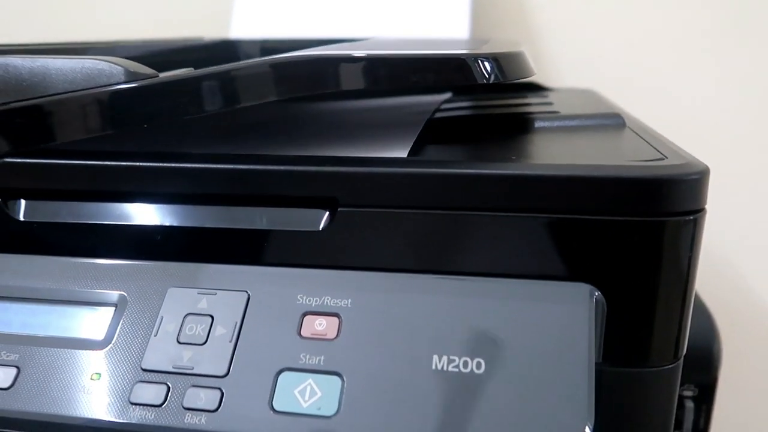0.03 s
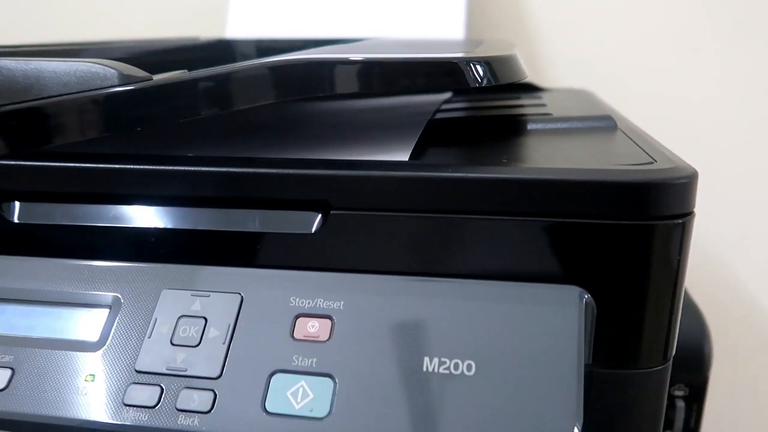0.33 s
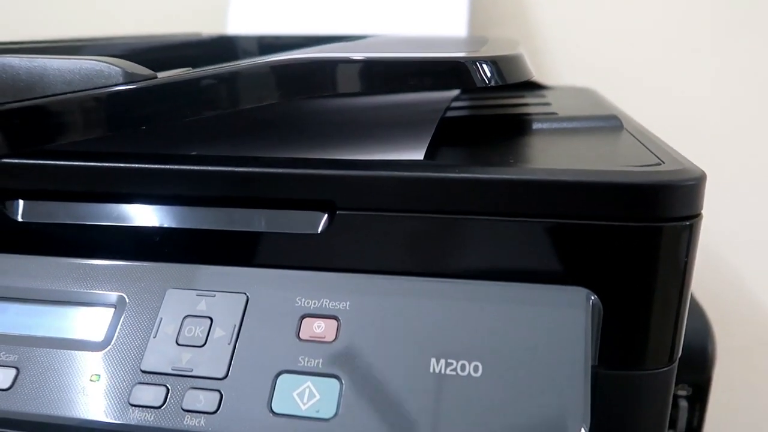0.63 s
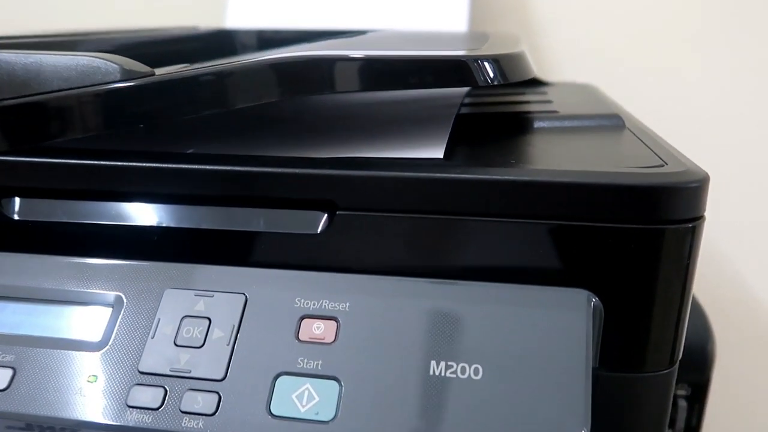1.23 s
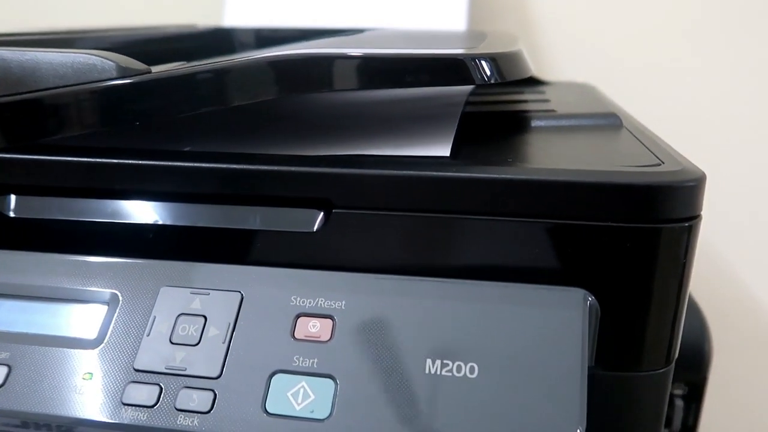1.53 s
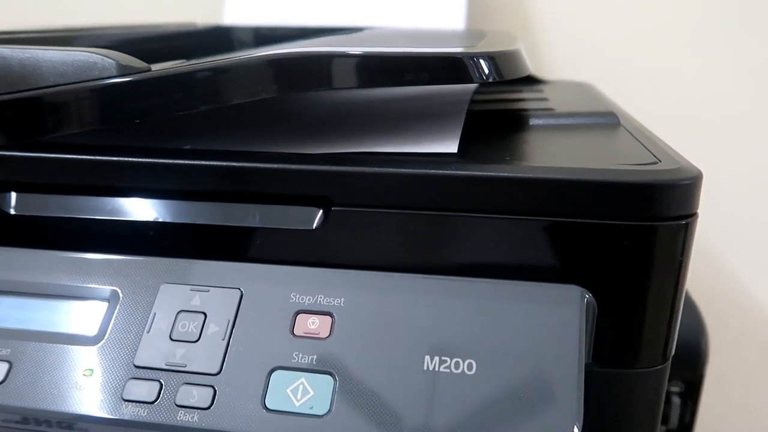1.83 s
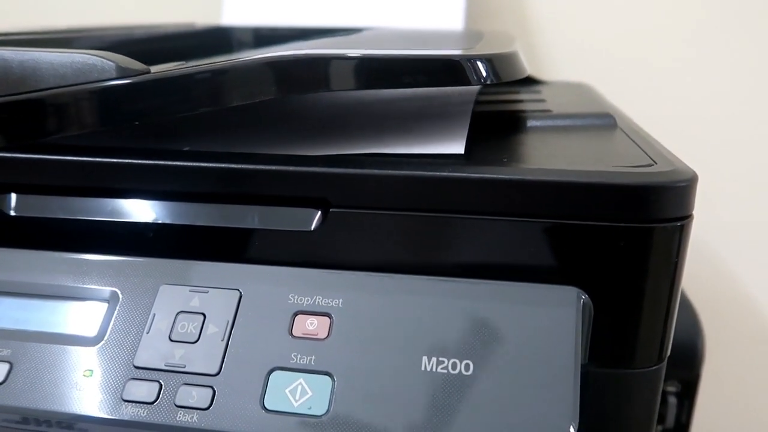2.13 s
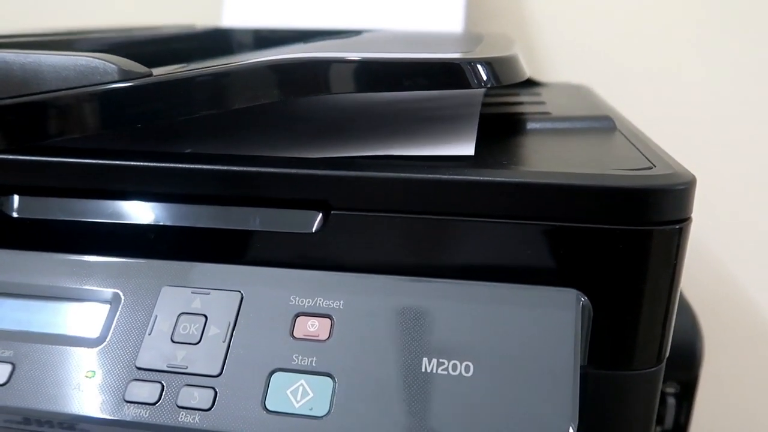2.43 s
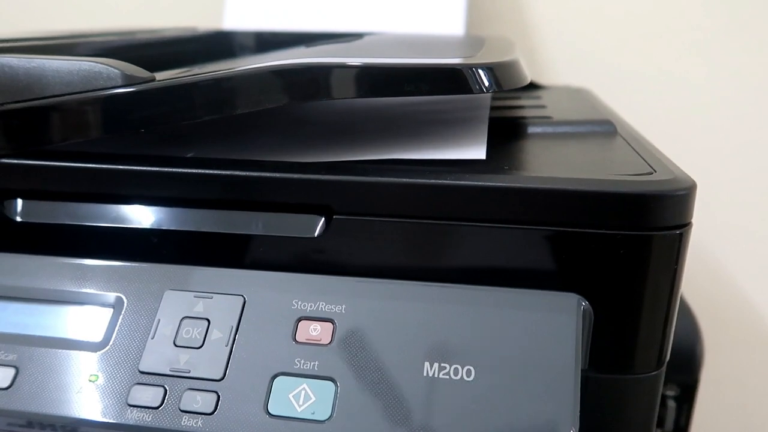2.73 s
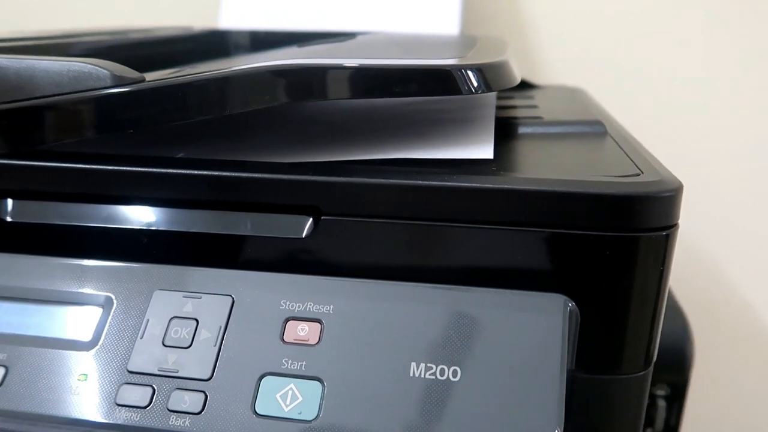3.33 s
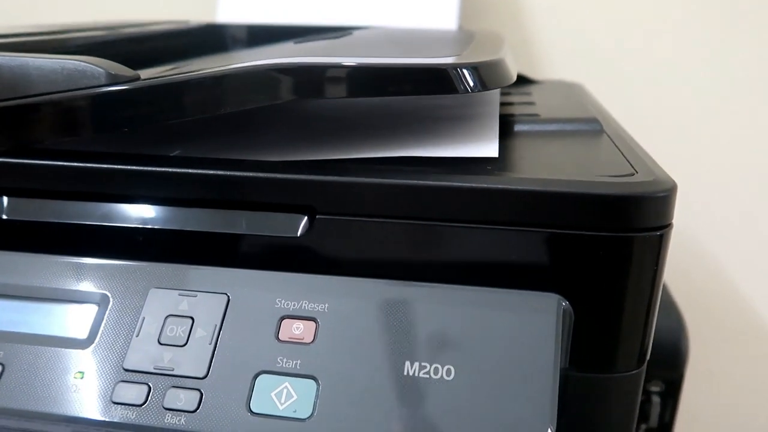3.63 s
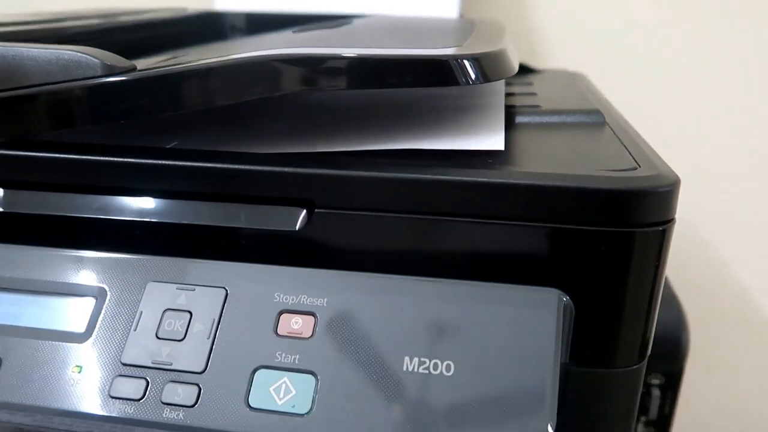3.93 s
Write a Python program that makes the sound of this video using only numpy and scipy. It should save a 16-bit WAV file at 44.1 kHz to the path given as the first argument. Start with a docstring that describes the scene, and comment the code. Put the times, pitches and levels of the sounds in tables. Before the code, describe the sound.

A desktop printer hums and whines, feeding a sheet with occasional plastic clacks and brief rasps.

```python
"""A desktop printer feeds a sheet: its stepper motor sings over whirring plastic gears and sliding paper.
A second drive makes three short, rasping advances; the stepper stops just before the last one.
Levers clack, small parts tick and squeak, and the edge of the sheet snaps off a guide.
Underneath, the hand holding the microphone adds low bumps, rumble and finger rub."""
import sys
import numpy as np
from scipy import signal
from scipy.fft import rfft, irfft
from scipy.io import wavfile

SR = 44100
rng = np.random.default_rng(int(sys.argv[2]) if len(sys.argv) > 2 else 0)


def to_wav(s):
    """Save 16-bit WAV."""
    ch = np.atleast_2d(s).T  # columns
    pcm = np.round(np.clip(ch, -1, 1) * 32767)  # PCM
    wavfile.write(sys.argv[1], SR, pcm.astype(np.int16))


N = 176400
T = np.arange(N) / SR

# stepper partials: step_rate_multiple, level_db
STEPPER_PARTIALS = [(1, -39), (1.5, -49), (3, -57), (4, -56), (6, -63)]
# the strong second partial, swelling as the sheet comes out: time_s, level_db
WHINE_LEVEL = [(0, -36), (.5, -42), (.8, -36.5), (1.15, -40), (1.5, -36.5), (2.6, -35.5), (3.3, -33)]
# gear train tones: pitch_hz, level_db
GEAR_TONES = [(44.5, -47.5), (88.3, -48), (119, -46.5), (178.1, -56.5), (196.6, -53.5), (214.6, -46),
              (221.6, -45.5), (242.7, -48), (311.5, -43), (400.5, -55.5), (476, -46), (660.7, -52.5),
              (748.7, -52), (1103.6, -56), (1235, -55)]
def feeder_motor(step_hz=433.6, stop_s=3.84, fade_s=0.0041, hum_hz=99.45, hum_db=-45):
    """Steady stepper partials and looser gear tones stop together; the mains hum stays."""
    slip = 0.006 * drift(30)
    steps = sum(amp(db) * tone(k * step_hz, k * slip) for k, db in STEPPER_PARTIALS)
    whine = curve(WHINE_LEVEL) * flutter(0.7, 8) * tone(2 * step_hz, 2 * slip)
    gears = sum(amp(db) * flutter(2, 13) * tone(hz, 0.047 * drift(1.1)) for hz, db in GEAR_TONES)
    running = np.exp(-np.maximum(T - stop_s, 0) / fade_s)
    hum = amp(hum_db) * tone(hum_hz)
    return widened((steps + whine + gears) * running + hum, apart=0.045)


# gear whirr EQ: freq_hz, gain_db
WHIRR_EQ = [(20, -32), (45, -22), (90, -2), (190, -5.5), (270, -4.5), (420, -6.5), (800, -7.5), (1200, -13),
            (1900, -19.5), (3200, -28.5), (5500, -36), (8000, -44.5), (11000, -49.5), (14000, -84)]
# housing drone EQ: freq_hz, gain_db
DRONE_EQ = [(20, -30), (50, -12.5), (95, 7.5), (135, -7), (185, 6), (250, -5.5), (330, -4.5), (500, -14.5),
            (1500, -70)]
# drone envelope: time_s, level_db
DRONE_LEVEL = [(0, -51), (.4, -35), (1.2, -35.5), (2, -32), (3.2, -34), (4, -32)]
def gear_whirr(whirr_db=-33):
    """Teeth knock densely inside the plastic housing, which drones more as the sheet advances."""
    whirr = amp(whirr_db) * spread(chatter(per_s=1200, spread_db=1.5, share=0.4), WHIRR_EQ)
    drone = curve(DRONE_LEVEL) * spread(rng.standard_normal((2, N)), DRONE_EQ)
    return flutter(0.23, 37) * (whirr + drone)


# paper scrape EQ: freq_hz, gain_db
SCRAPE_EQ = [(300, -44), (1200, 1), (2300, 0.5), (4600, -2.5), (6500, -7), (8500, -14), (11500, -18),
             (14500, -89)]
# scrape envelope: time_s, level_db
SCRAPE_LEVEL = [(0, -53), (.2, -50.5), (.35, -54), (.58, -66), (.65, -57), (.76, -54), (.84, -55),
                (1.05, -49.5), (1.3, -53.5), (1.85, -54), (2.0, -51), (2.3, -49), (2.55, -53.5), (2.7, -66),
                (2.9, -63), (3.1, -49.5), (3.5, -57.5), (4, -52.5)]
# airy hiss EQ: freq_hz, gain_db
AIR_EQ = [(1000, -8), (4000, -8), (8000, 4), (12000, 2), (13500, 5), (15200, -11)]
def sliding_paper(air_db=-61.5, air_follow=0.35):
    """The sheet scrapes along its guides; a wide, airy hiss loosely follows its level."""
    level = curve(SCRAPE_LEVEL) * flutter(1.6, 17)
    scrape = level * spread(chatter(per_s=1500, spread_db=2, share=0.25), SCRAPE_EQ, side_db=-1)
    air = amp(air_db) * unit(level ** air_follow * colour(rng.standard_normal(N), AIR_EQ))
    return scrape + np.array([air, -air])


# moves of the second drive: start_s, length_s, level_db, top_pitch_hz, loudest_at_fraction
ADVANCES = [(0.784, 0.11, -31, 568, 0.53), (2.896, 0.11, -30, 575, 0.8), (3.883, 0.1193, -28, 561, 0.57)]
# gear rasp EQ: freq_hz, gain_db
RASP_EQ = [(150, 1), (500, 5), (1100, 1), (1500, -2.5), (2400, -5.5), (3200, -12.5), (5500, -18.5),
           (7500, -27.5), (11000, -29.5), (15000, -53)]
# casing resonances, also heard in the rattles and ticks: centre_hz, width_hz, gain_db
CASING_PEAKS = [(586, 12, 10), (1000, 41, 6), (1790, 140, 1), (2470, 430, 1.5), (3160, 200, -0.5),
                (3850, 280, 2.5), (5650, 150, 5)]
def drive_advances(rub_from_hz=850, rub_to_hz=1400, rub_db=-6.5, whine_db=-10.5, swell_db=3.5):
    """The second drive speeds up and brakes: gears rasp, their whine arches and a rub climbs in pitch."""
    rasp = spread(chatter(per_s=700, spread_db=0.5, share=0.43), RASP_EQ, CASING_PEAKS, side_db=-2)
    out = np.zeros((2, N))
    for start, length, db, top_hz, crest in ADVANCES:
        travel = np.clip((T - start) / length, 0, 1)
        speed = np.sin(np.pi * travel)
        hz = top_hz * (0.6 + 0.4 * speed)
        wobble = 0.022 * drift(86)
        whine = tone(hz, wobble) + amp(-4) * tone(2 * hz, 2 * wobble)
        rub_hz = rub_from_hz + (rub_to_hz - rub_from_hz) * travel
        rub = amp(rub_db) * np.sqrt(abs(speed)) * whistle(rub_hz, width_hz=90)
        effort = np.interp(travel, [0, crest, 1], [0, 1, 0])
        level = amp(db - swell_db * (1 - effort) ** 2) * gate(start, length, rise_s=0.0095, fall_s=0.037)
        out += level * (rasp + rub + amp(whine_db) * speed ** 2 * whine)
    return out


# knocks against the frame: start_s, level_db, focus_hz
CLACKS = [(.053, -30, 1490), (.205, -33, 1050), (0.785, -24.5, 900), (.796, -33, 980), (.826, -27, 1140),
          (.829, -24, 567), (0.849, -29, 680), (.87, -31.5, 1890), (1.229, -31, 950), (2.894, -37, 2600),
          (2.921, -29.5, 1000), (2.932, -36, 1310), (2.941, -28, 1200), (2.978, -31.5, 2400),
          (2.983, -26, 1370), (3.018, -35, 1500), (3.04, -38, 1700), (3.884, -32.5, 2800),
          (3.886, -35, 1060), (3.917, -36, 1020), (3.919, -27, 560), (3.931, -26, 584), (3.94, -29, 1100),
          (3.961, -28, 1720)]
# plastic frame modes: pitch_hz, level_db
FRAME_MODES = [(560, -9), (760, 0.5), (950, -1.5), (1070, 1.5), (1280, -5.5), (1700, 0), (2100, -3.5),
               (2430, -2), (3200, -4), (3800, -2)]
def clacks():
    """Levers and gears knock on the frame as the drives take up or let go of their load."""
    knocks = strikes(CLACKS, FRAME_MODES, focus_db_per_oct=17, detune=0.044, rise_s=0.0016, decay_s=0.012)
    return widened(knocks, apart=0.053)


# soft runs of the mechanism: start_s, length_s, level_db, fade_db_per_s (negative swells)
RATTLES = [(-.05, 0.26, -38, -10.5), (0.6, .16, -44, 15), (0.871, 0.49, -38.5, 21),
           (2.996, 0.38, -36.5, 28), (3.42, .4, -48.5, 6)]
# rattle EQ: freq_hz, gain_db
RATTLE_EQ = [(300, -10), (800, 1), (1300, 3.5), (2500, -3.5), (3600, -8.5), (5600, -23.5), (8000, -25.5),
             (12000, -35.5), (15000, -66)]
def rattles():
    """The mechanism rattles softly through the casing in short runs."""
    level = sum(amp(db - fade * np.maximum(T - start, 0)) * gate(start, length, rise_s=0.049, fall_s=0.12)
                for start, length, db, fade in RATTLES)
    rattle = spread(chatter(per_s=900, spread_db=0, share=0.42), RATTLE_EQ, CASING_PEAKS, side_db=-1.5)
    return level * flutter(0.1, 40) * rattle


# flicks of the paper's edge: start_s, level_db, focus_hz
SNAPS = [(.204, -33, 3600), (.243, -47, 4700), (2.974, -44, 11000), (3.076, -47, 11500),
         (3.742, -36.5, 5600)]
# ring of a snap: pitch_hz, level_db
SNAP_MODES = [(4050, 1), (4600, -2), (6150, -3), (8200, -7.5), (11500, -7)]
def paper_snaps():
    """The edge of the sheet flicks off a guide with a fine, high ring."""
    return strikes(SNAPS, SNAP_MODES, focus_db_per_oct=10, detune=0.015, rise_s=0.0006, decay_s=0.0028)


# small plastic ticks: start_s, level_db, decay_s
TICKS = [(.072, -43, .008), (.102, -43, 0.0064), (.135, -41, .012), (.242, -43, .008),
         (0.787, -42.5, 0.011), (.809, -42, 0.0092), (0.872, -38, 0.0064), (2.96, -38, .01),
         (3.884, -44, 0.0067), (3.955, -42, .009)]
# tick EQ: freq_hz, gain_db
TICK_EQ = [(500, -18), (2400, -1), (4000, 6), (6000, -2), (9000, -15), (12000, -18), (15000, -37)]
def ticks(rise_s=0.0014):
    """Plastic parts give brief, dry ticks that ring the casing."""
    level = sum(amp(db) * gate(start, 0, rise_s, decay_s) for start, db, decay_s in TICKS)
    return level * spread(rng.standard_normal((2, N)), TICK_EQ, CASING_PEAKS, side_db=-5)


# squeaks of rubbing parts: start_s, length_s, pitch_hz, level_db, glide_hz
SQUEAKS = [(0.12, .035, 2560, -46, -76), (0.858, 0.14, 2420, -51, -600), (1.026, 0.08, 5670, -56, -0.5),
           (2.954, 0.018, 2500, -40, 250.5), (3.07, 0.26, 3060, -52.5, 61), (3.11, .07, 5630, -60, 1),
           (3.1, 0.72, 4020, -65, -1), (3.94, 0.021, 3040, -40, 450)]
def squeaks():
    """Sliding parts catch and sing briefly, gliding as they speed up or slow down."""
    out = np.zeros(N)
    for start, length, hz, db, glide_hz in SQUEAKS:
        travel = np.clip((T - start) / length, 0, 1)
        squeak = whistle(hz + glide_hz * (travel - 0.5), width_hz=71)
        out += amp(db) * gate(start, length, rise_s=0.0055, fall_s=0.0077) * squeak
    return widened(out, apart=0.21)


# handling bumps: centre_s, level_db, pitch_hz
BUMPS = [(0.427, -19, 72.5), (0.444, -23, 86), (0.762, -25.5, 110), (1.039, -24, 88), (1.716, -22, 100),
         (2.256, -13, 94), (2.354, -19.5, 100.8), (2.607, -18, 62), (3.301, -20, 73.5), (3.99, -19, 95)]
# rumble EQ: freq_hz, gain_db
RUMBLE_EQ = [(15, -24), (45, 5), (100, -1.5), (180, -14), (400, -25), (1000, -80)]
# rumble envelope: time_s, level_db
RUMBLE_LEVEL = [(0, -80), (.7, -33.5), (.95, -56), (1.45, -42), (1.68, -25), (1.9, -52), (2.35, -36),
                (2.8, -33.5), (3.0, -58), (3.3, -38), (4, -55)]
# finger rub EQ: freq_hz, gain_db
FINGER_EQ = [(25, -23), (70, 12), (120, 4.5), (210, 7), (320, -6), (450, -17), (650, -47)]
# finger rub envelope: time_s, level_db
FINGER_LEVEL = [(0, -88), (.25, -60), (.43, -44), (.55, -62), (.75, -49), (1.2, -72), (1.55, -48),
                (1.62, -36), (1.73, -33), (1.8, -62), (2.2, -67), (2.26, -36), (2.45, -43), (2.82, -45),
                (2.95, -74), (3.3, -47.5), (3.9, -66), (4, -31)]
def handling(bump_width_s=0.006, lean_left=0.13):
    """A hand on the microphone: soft bumps of a cycle or two over uneven rumble and wide finger rub."""
    fingers = curve(FINGER_LEVEL) * unit(colour(rng.standard_normal(N), FINGER_EQ))
    rumble = curve(RUMBLE_LEVEL) * spread(rng.standard_normal((2, N)), RUMBLE_EQ)
    bumps = np.zeros(N)
    for centre_s, db, hz in BUMPS:
        t = T - centre_s
        bumps -= amp(db) * np.exp(-(t / bump_width_s) ** 2) * np.cos(2 * np.pi * hz * t)
    return rumble + np.array([fingers, -fingers]) + np.outer([1 + lean_left, 1 - lean_left], bumps)


def shell_reflections(dry, wet_db=-7, decay_s=0.0083, size=2048, count=14):
    """Reflections inside the shell smear each knock and ripple its treble, changing as parts move."""
    t, wet = np.arange(size) / SR, np.zeros((2, N))
    highpass = signal.butter(2, 1500, "high", fs=SR, output="sos")
    for k in range(count):
        tail = signal.sosfilt(highpass, rng.standard_normal(size) * np.exp(-t / decay_s))
        crossfade = np.sqrt(np.maximum(1 - abs(np.linspace(0, count - 1, N) - k), 0))
        wet += signal.oaconvolve(dry * crossfade, tail[None] / np.linalg.norm(tail))[:, :N]
    return (dry + amp(wet_db) * wet) / np.hypot(1, amp(wet_db))


# stereo width, opening toward the treble: freq_hz, side_minus_mid_db
WIDTH_EQ = [(50, -26), (130, -46), (230, -34), (400, -22), (600, -22.5), (1170, -14.5), (2120, -10.5),
            (3840, -4.5), (7000, -1), (12600, 8)]
def spread(streams, eq, peaks=(), side_db=0):
    """Colours two streams and places them as mid and side."""
    mid, side = (unit(colour(x, eq, peaks)) for x in streams)
    side = amp(side_db) * colour(side, WIDTH_EQ)
    return np.array([mid + side, mid - side])


def widened(sound, apart):
    """Gives one sound a small phase difference between the ears."""
    side = apart * signal.hilbert(sound).imag
    return np.array([sound + side, sound - side])


def strikes(blows, modes, focus_db_per_oct, detune, rise_s, decay_s, size=4096):
    """Each blow rings all the modes, slightly detuned, favouring those near its focus pitch."""
    t, out = np.arange(size) / SR, np.zeros(N)
    mode_hz, mode_db = np.transpose(modes)[:, :, None]
    envelope = np.minimum(t / rise_s, 1) * np.exp(-t / decay_s)
    for start, db, focus_hz in blows:
        shift, phase = rng.random((2, len(modes), 1))
        hz = mode_hz * (1 + detune * (2 * shift - 1))
        weight = amp(mode_db - focus_db_per_oct * abs(np.log2(mode_hz / focus_hz)))
        ring = unit(np.sum(weight * np.sin(2 * np.pi * (hz * t + phase)), axis=0))
        slot = out[round(start * SR):][:size]
        slot += (amp(db) * envelope * ring)[:len(slot)]
    return out


def chatter(per_s, spread_db, share):
    """Two streams of tiny impacts in smooth friction noise; share is the impacts' part of the power."""
    hits = (rng.random(N) < per_s / SR) * amp(spread_db * np.minimum(rng.exponential(1, N), 3))
    impacts = unit(hits * rng.choice([-1, 1], (2, N)))
    return np.sqrt(share) * impacts + np.sqrt(1 - share) * rng.standard_normal((2, N))


def whistle(hz, width_hz):
    """Friction noise caught in one narrow, moving resonance."""
    hiss = rng.standard_normal(N) + 1j * rng.standard_normal(N)
    band = np.fft.ifft(np.fft.fft(hiss) / (1 + (np.fft.fftfreq(N, 1 / SR) / width_hz) ** 2))
    return unit((band * np.exp(2j * np.pi * np.cumsum(hz) / SR)).real)


def tone(hz, phase_turns=0):
    """A sine of rms 1 on a steady or moving pitch."""
    return np.sqrt(2) * np.sin(2 * np.pi * (np.cumsum(hz * np.ones(N)) / SR + phase_turns + rng.random()))


def colour(x, eq, peaks=()):
    """Filters by an EQ outline plus resonance peaks."""
    hz = np.fft.rfftfreq(N, 1 / SR)
    eq_hz, eq_db = np.transpose(eq)
    outline_db = np.interp(np.log(hz + 1), np.log(eq_hz), eq_db)
    peaks_db = sum(db / (1 + (2 * (hz - centre) / width) ** 2) for centre, width, db in peaks)
    return irfft(rfft(x) * amp(outline_db + peaks_db), N)


def drift(rate_hz):
    """Slow random motion of rms 1."""
    hz = np.fft.rfftfreq(N, 1 / SR)
    return unit(irfft(rfft(rng.standard_normal(N)) * (hz > 0) / (1 + (hz / rate_hz) ** 2), N))


def flutter(depth_db, rate_hz):
    """A randomly wavering gain."""
    return amp(depth_db * drift(rate_hz))


def gate(start, length, rise_s, fall_s):
    """Linear attack, hold, exponential release."""
    return np.clip((T - start) / rise_s, 0, 1) * np.exp(-np.maximum(T - start - length, 0) / fall_s)


def curve(points):
    """Gain over time from (time_s, level_db) points."""
    return amp(np.interp(T, *np.transpose(points)))


def amp(db):
    """Decibels to gain."""
    return 10 ** (np.asarray(db) / 20)


def unit(x):
    """Scales to rms 1."""
    return x / np.sqrt(np.mean(x ** 2) + 1e-20)


def scene():
    """The whole printer and the hand on the microphone, in stereo."""
    motor = feeder_motor()
    mechanism = shell_reflections(gear_whirr() + sliding_paper() + drive_advances() + rattles())
    return motor + mechanism + clacks() + paper_snaps() + ticks() + squeaks() + handling()


def record(dry):
    """A steep low-pass trims the very top of the treble."""
    lowpass = signal.firwin(511, cutoff=15200, window=("kaiser", 9), fs=SR)
    return signal.oaconvolve(dry, lowpass[None], "same")


dry = scene()
out = record(dry)
to_wav(out)
```